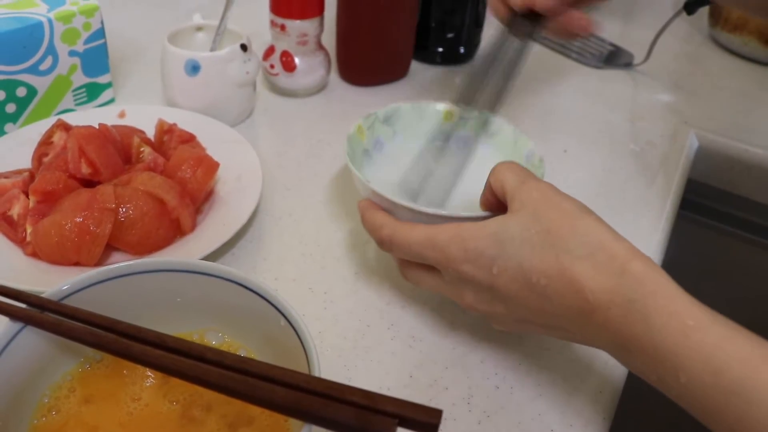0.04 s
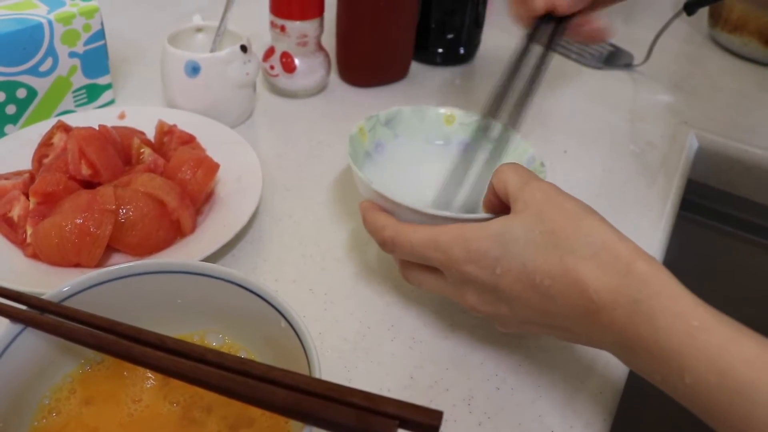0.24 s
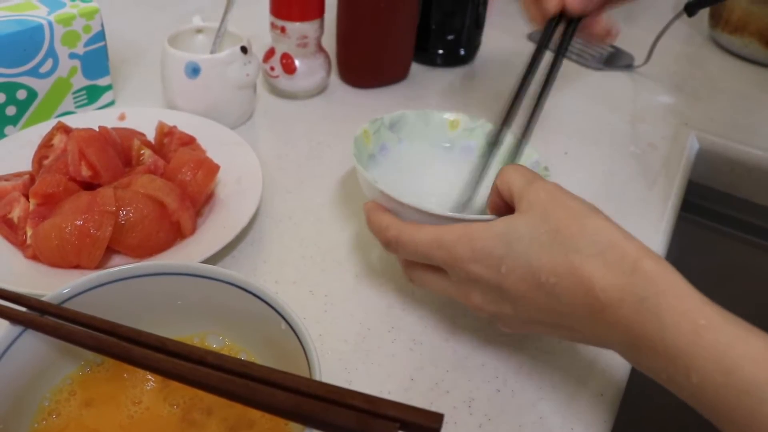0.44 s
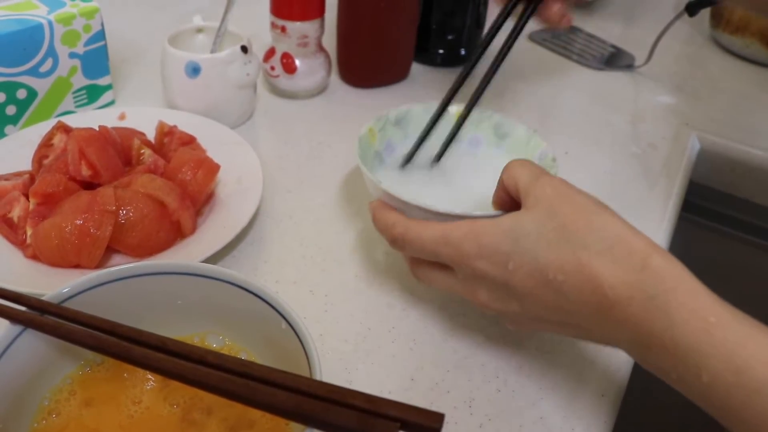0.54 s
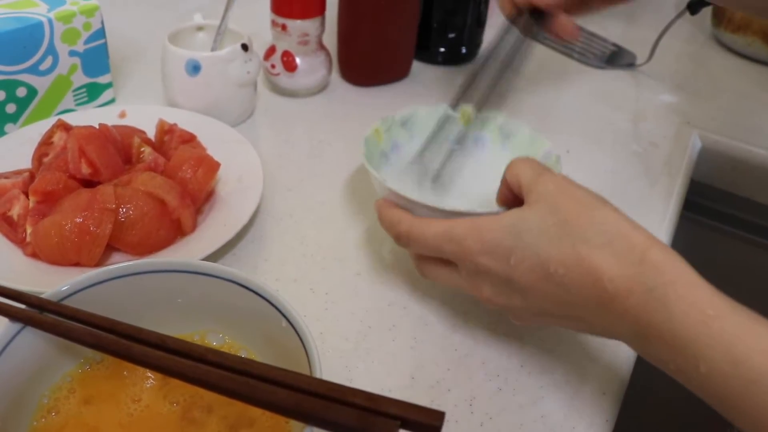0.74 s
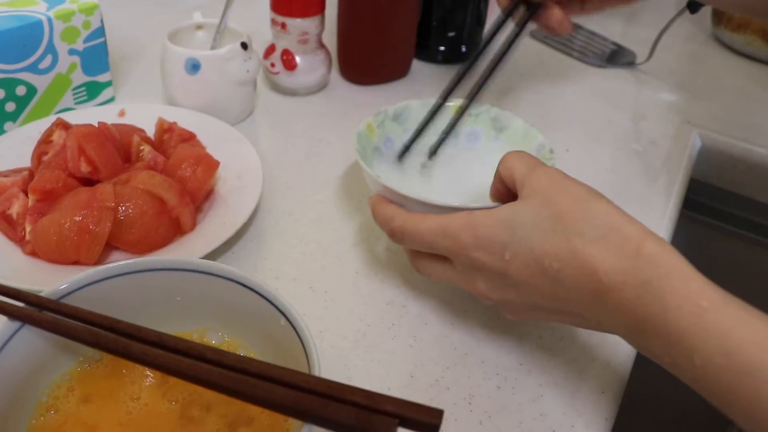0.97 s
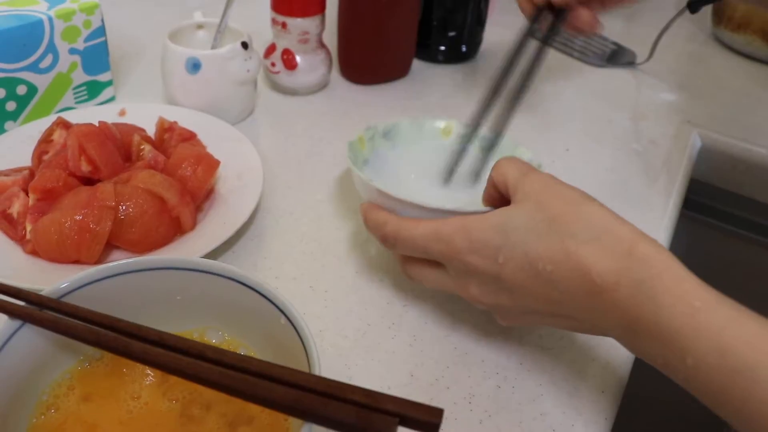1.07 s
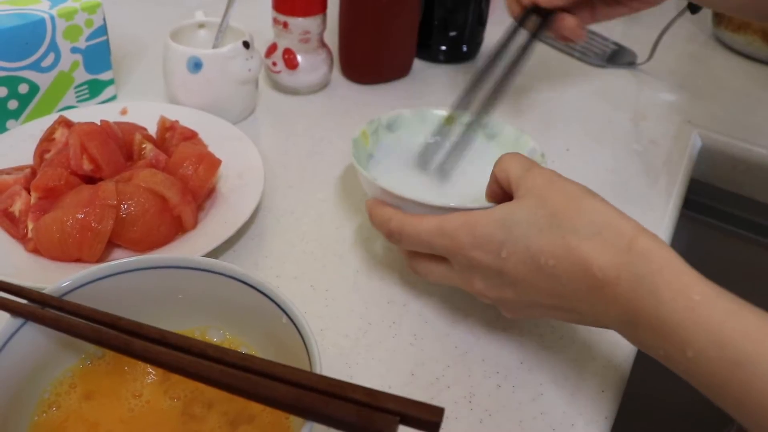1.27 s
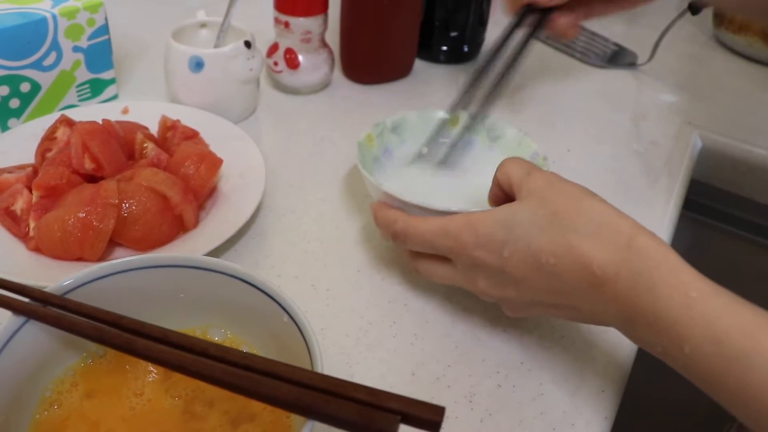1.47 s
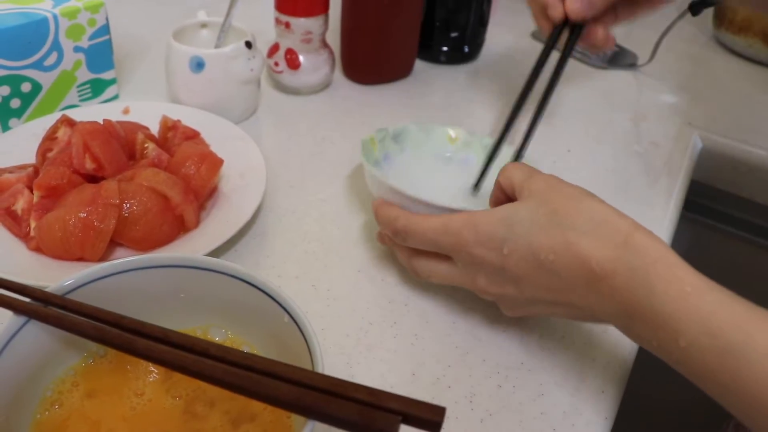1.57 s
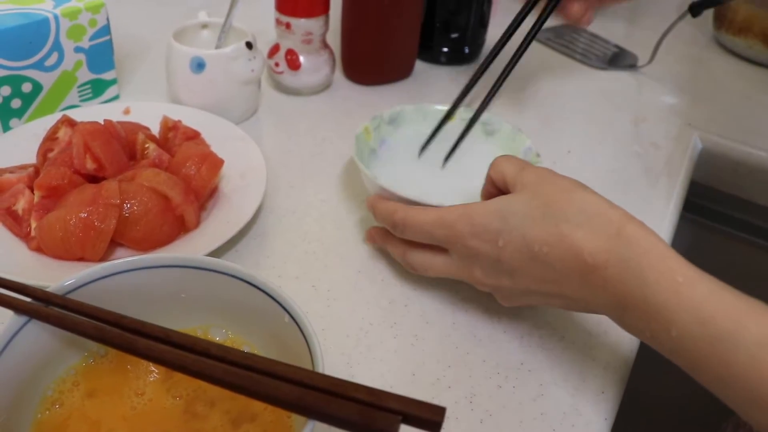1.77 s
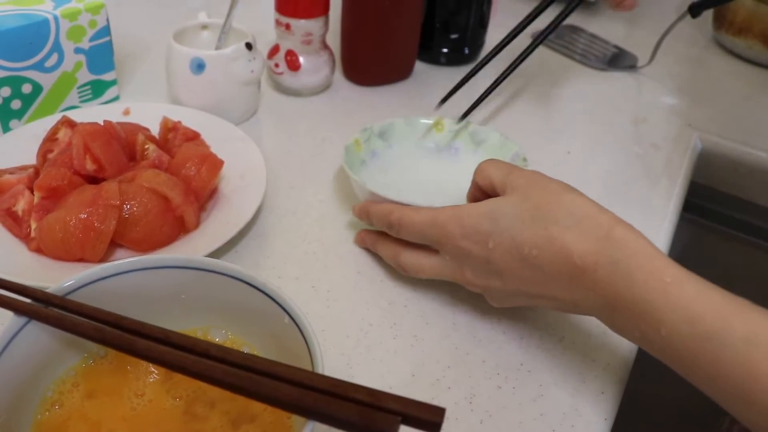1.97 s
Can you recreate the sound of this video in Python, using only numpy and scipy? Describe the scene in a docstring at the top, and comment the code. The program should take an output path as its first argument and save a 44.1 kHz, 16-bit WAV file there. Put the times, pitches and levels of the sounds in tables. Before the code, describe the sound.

Soft whisking of liquid with chopsticks, ending in a clink and a bowl set down hard.

```python
"""Whisking with chopsticks

Close to a hand-held ceramic bowl in a small ringing kitchen; stereo microphone, an appliance humming
behind. Chopsticks whisk a thin liquid: it sloshes, trapped bubbles ring, the tips scrape and tick on the
glaze. One chopstick clinks on the rim, then the bowl knocks on the counter, hard and then softly.
The microphone's limiter ducks after the hard knock."""
import sys
import numpy as np
from scipy import signal
from scipy.fft import rfft, irfft, next_fast_len
from scipy.io import wavfile
from scipy.ndimage import minimum_filter1d, map_coordinates

SR = 44100
rng = np.random.default_rng(int(sys.argv[2]) if len(sys.argv) > 2 else 0)


def materialize(psi):
    """Save the field psi as 16-bit PCM at rate SR to the path in sys.argv[1].

    A 1-D psi becomes a single channel; in a 2-D psi each row is a channel.
    """
    bounded = np.clip(np.atleast_2d(psi).T, -1, 1)
    quanta = np.round(bounded * 32767).astype(np.int16)
    wavfile.write(sys.argv[1], SR, quanta)


N = 88817

# room tone: f/Hz, level/dB
AIR_SPECTRUM = [(15, -30), (34, 0.5), (60, -12), (170, -1.5), (250, -10), (320, -5), (500, -12),
                (840, -16.5), (1940, -16.5), (3600, -24), (5000, -31.5), (6100, -24.5), (11300, -25.5),
                (16000, -35.5)]
# room tone across the microphone pair: f/Hz, left-right likeness
AIR_LIKENESS = [(40, 0.49), (150, 0.87), (400, 0.57), (1200, 0.1), (3000, 0.046)]
# decay of the kitchen: f/Hz, t60/s
ROOM_DECAY = [(150, 0.62), (500, 0.4), (3500, 0.35), (15000, 0.24)]
# colour of the kitchen's tail: f/Hz, level/dB
ROOM_SPECTRUM = [(60, -10), (140, 12), (270, 6), (420, 3), (650, 8), (1100, 3.5), (2000, 0), (3000, 3),
                 (6000, 0)]
# reflections across the microphone pair: f/Hz, left-right likeness
ROOM_LIKENESS = [(130, 1), (300, 0.9), (640, 0.7), (1400, 0.47), (3000, 0.023)]
# direct sound from the bowl in the hand: f/Hz, left minus right/dB
BOWL_BALANCE = [(800, 1.5), (2300, -10.5), (4400, 0), (8000, -11.5), (14000, -7.5)]
# direct sound from the counter: f/Hz, left minus right/dB
KNOCK_BALANCE = [(110, 5), (330, -4), (700, 3), (1300, 4.5), (2300, -6), (5000, 14)]
# the bowl's foot meeting the counter: t/s, gain/dB, treble corner/Hz
COUNTER_KNOCKS = [(1.6277, 2, 6000), (1.9944, -8, 1650)]
# bowl and counter ringing together: f/Hz, level/dB, t60/s
COUNTER_MODES = [(445, -7.5, 0.032), (560, -12, .022), (725, -21, 0.04), (885, -22, .03),
                 (1020, -11.5, 0.024), (1295, -21, 0.025), (1630, -6.5, 0.018), (2010, -17, 0.04),
                 (2335, -28, 0.04), (3030, -23, 0.03)]
# dense thud of the counter top: f/Hz, level/dB
THUD_SPECTRUM = [(80, -30), (250, -14), (500, 5), (1700, -1), (3200, -3), (4200, -11), (7000, -28),
                 (15000, -38)]
# ring of the rim: f/Hz, level/dB, t60/s
RIM_MODES = [(2009, -14, .12), (3145, -24, .08), (3755, -4, .02), (3826, -5, .02), (6033, -4, .034),
             (6250, 2, .016), (7095, -19, .05), (7639, -23, .09), (8500, -1, .014), (8600, -2, .02),
             (11400, -23, .12), (11525, -10, .026), (14980, -21, .03), (15450, -22, .04)]
# contact noise of chopstick on rim: f/Hz, level/dB
CRACK_SPECTRUM = [(500, -25), (2500, 2), (4800, -3), (8600, 0), (9800, -12), (12200, -7), (16000, -17)]
# tips touching the wall under the liquid: t/s, level/dB, band centre/Hz
TIP_TICKS = [(0.112, -41, 9100), (0.267, -50, 7000), (.307, -49, 10500), (.368, -44, 6040),
             (.464, -49, 2300), (0.675, -44.5, 5000), (.711, -50, 11300), (0.828, -49, 3300),
             (0.9406, -39, 8000), (1.023, -46, 6000), (1.271, -34.5, 2040), (1.367, -41, 7800),
             (1.448, -37, 8750), (1.483, -44, 7560), (1.532, -41, 7600), (1.532, -44, 2000),
             (1.623, -35, 2690), (1.801, -50, 6400)]
# single clear bubbles: t/s, starting f/Hz, level/dB, t60/s, rise/(octaves/s)
CLEAR_BUBBLES = [(.119, 2870, -48, 0.027, 12), (.209, 1645, -45, 0.046, 5), (0.227, 2200, -45.5, 0.044, 12),
                 (.268, 1740, -46, 0.034, 3.2), (.347, 2630, -49, 0.035, 25), (.575, 2070, -38, 0.037, 7.4),
                 (.706, 2780, -38.5, 0.027, 5.5), (.801, 1838, -43, 0.043, 19),
                 (.811, 1810, -35, 0.012, 5.5), (.827, 2925, -41.5, 0.041, 6.5),
                 (.932, 1890, -45, 0.055, 6.2), (1.015, 1480, -31.5, 0.029, 24.3),
                 (1.02, 1658, -34.5, 0.038, 2), (1.284, 1280, -36, 0.016, 6.2),
                 (1.346, 2325, -44.5, 0.061, 30), (1.448, 1414, -36, 0.072, 39),
                 (1.455, 2154, -34, 0.026, 53), (1.458, 2960, -24, 0.021, 11)]
# sloshing liquid: f/Hz, level/dB
SLOSH_SPECTRUM = [(400, -34), (1100, -16), (1800, 3.5), (2400, 0), (3100, 5), (4000, -22), (7000, -14.5)]
# tips scraping the glaze: f/Hz, level/dB
SCRAPE_SPECTRUM = [(1500, -33), (3000, -6), (4500, 1), (6200, 1.5), (6900, -2.5), (7550, 5), (8300, -3),
                   (10000, 2), (11400, 6), (12600, -2), (16000, -15.5)]
# strokes through the liquid: middle t/s, half length/s, slosh level/dB, scrape level/dB
WHISK_STROKES = [(0.032, 0.024, -56.5, -55), (0.137, 0.023, -60.5, -64), (0.217, 0.016, -58, -59),
                 (0.362, 0.027, -64, -59), (0.454, 0.034, -59.5, -61.5), (0.575, 0.019, -56, -54.5),
                 (0.66, 0.025, -58.5, -59), (0.711, 0.029, -57, -57.5), (0.801, 0.02, -56, -60),
                 (0.926, 0.021, -52.5, -53), (1.017, 0.015, -53.5, -54), (1.13, 0.027, -65.5, -73),
                 (1.187, 0.017, -58.5, -56), (1.281, 0.024, -55, -68), (1.384, 0.02, -53.5, -57),
                 (1.482, 0.01, -50.5, -58), (1.561, 0.017, -53.5, -78)]

SIDES = np.array([[.5], [-.5]])  # left and right each take half of a difference


def amp(db):
    return 10 ** (np.asarray(db) / 20)


def unit_rms(x):
    return x / np.sqrt(np.mean(x ** 2) + 1e-20)


def along(points, hz):
    """A curve through (f/Hz, value) points, read on a log axis."""
    freqs, values = np.transpose(points)
    return np.interp(np.log(hz + 1), np.log(freqs + 1), values)


def since(s):
    """Seconds since s, zero before it."""
    return np.maximum(np.arange(N) / SR - s, 0)


def fade(s, t60):
    """A sudden start at s and an exponential decay."""
    t = since(s)
    return (t > 0) * amp(-60 * t / t60)


def ring(s, modes):
    """Damped sines (f/Hz, level/dB, t60/s) of a body struck at s."""
    t = since(s)
    return sum(amp(db) * fade(s, t60) * np.sin(2 * np.pi * hz * t) for hz, db, t60 in modes)


def wobble(rate):
    """A smooth random curve, rate knots a second."""
    return map_coordinates(rng.standard_normal(N), [np.arange(N) * rate / SR])


def filtered(x, response):
    """x through a complex frequency response."""
    size = next_fast_len(N + SR // 2)
    return irfft(rfft(x, size) * response(np.fft.rfftfreq(size, 1 / SR)), size)[..., :N]


def low_cut(hz, corner_hz):
    """Second-order high-pass: small bodies radiate little bass."""
    s = 1j * hz / corner_hz
    return s * s / (1 + np.sqrt(2) * s + s * s)


def high_cut(hz, corner_hz):
    """Response of a soft contact: a gentle tilt, then a steep fall above the corner."""
    s = 1j * hz / corner_hz
    return 1 / ((1 + 2 * s) * (1 + s + s * s))


def noise(spectrum):
    """Coloured noise of rms 1."""
    return unit_rms(filtered(rng.standard_normal(N), lambda hz: amp(along(spectrum, hz))))


def diffuse(pair, likeness):
    """Two unrelated sounds blended into left and right of a given likeness."""
    angle = lambda hz: np.arccos(np.clip(along(likeness, hz), -1, 1)) / 2
    mid, side = filtered(pair, lambda hz: np.array([np.cos(angle(hz)), np.sin(angle(hz))]))
    return np.array([mid + side, mid - side])


def room_tone(level_db=-56.5):
    """The kitchen's air, all around the microphone."""
    pair = np.array([noise(AIR_SPECTRUM), noise(AIR_SPECTRUM)])
    return amp(level_db) * unit_rms(diffuse(pair, AIR_LIKENESS))


def appliance_hum(hz=182.5, rms_db=-58.7, waver_db=.8):
    """An appliance's faint, slightly unsteady tone, centred in the background."""
    level = amp(rms_db + waver_db * wobble(rate=5))
    return np.sqrt(2) * level * np.sin(2 * np.pi * hz * since(0))


def early_echoes(first_s, last_s=0.01, level_db=-7.5, count=8):
    """Weak copies off counter, dishes and wall, different on each side of the microphone."""
    echoes = np.zeros((2, N))
    for side in echoes:
        delays = first_s + (last_s - first_s) * rng.random(count) ** 2
        side[(delays * SR).astype(int)] = rng.choice([-1, 1], count) / np.sqrt(count)
    return amp(level_db) * echoes


def in_kitchen(x, balance, tail_db=-12.5, first_echo_s=.0018, build_s=0.000896, left_lag_s=.000045):
    """At the microphone: the direct sound, on the right first, then early echoes and the room's tail."""
    hz, t, bands = signal.stft(rng.standard_normal((2, N)), SR, nperseg=256)
    decay = amp(-60 * t / along(ROOM_DECAY, hz)[:, None])
    tail = signal.istft(bands * decay, SR, nperseg=256)[1][:, :N]
    tail *= 1 - np.exp(-since(first_echo_s) / build_s)
    tail = filtered(tail / np.linalg.norm(tail[0]), lambda hz: amp(tail_db + along(ROOM_SPECTRUM, hz)))
    room = diffuse(tail + early_echoes(first_echo_s), ROOM_LIKENESS)
    reflected = signal.fftconvolve(x[None], room, axes=1)[:, :N]
    lag = lambda hz: np.exp(-2j * np.pi * hz * SIDES * left_lag_s)
    direct = filtered(x, lambda hz: amp(SIDES * along(balance, hz)) * lag(hz))
    return direct + reflected


def counter_knock(s, gain_db, corner_hz, push_s=.0001):
    """The bowl lands: a short push, modes of bowl and counter, a dense thud; softer contact is duller."""
    t = since(s)
    widths = t / push_s - 3  # time from the middle of the push, in pulse widths
    push = -amp(7.5) * widths * np.exp(-widths ** 2 / 2) * (t > 0)
    thud = amp(-11.5) * fade(s, t60=0.028) * noise(THUD_SPECTRUM)
    knock = push + ring(s, COUNTER_MODES) + thud
    return amp(gain_db) * filtered(knock, lambda hz: low_cut(hz, corner_hz=290) * high_cut(hz, corner_hz))


def rim_clink(s=1.5769, attack_s=0.00016):
    """A chopstick strikes the rim with a crack; the hand keeps the ring short."""
    rim = amp(-19) * ring(s, RIM_MODES)
    crack = amp(-29) * fade(s, t60=0.028) * noise(CRACK_SPECTRUM)
    contact = 1 - np.exp(-since(s) / attack_s)
    return filtered(contact * (rim + crack), lambda hz: low_cut(hz, corner_hz=1400))


def tip_ticks(attack_s=0.00034, width_octaves=0.73):
    """Light touches of the tips on the bowl's wall, cushioned by the liquid."""
    ticks = np.zeros(N)
    for s, db, centre_hz in TIP_TICKS:
        band = lambda hz: 1 / (1 + (2 * np.log2((hz + 1) / centre_hz) / width_octaves) ** 2)
        envelope = fade(s, t60=0.013) * (1 - np.exp(-since(s) / attack_s))
        ticks += amp(db) * envelope * unit_rms(filtered(rng.standard_normal(N), band))
    return ticks


def bubble(t, hz, t60, rise, attack_s=0.0017):
    """Trapped air rings briefly, rising in pitch as it surfaces."""
    phase = 2 * np.pi * np.cumsum(hz * 2 ** (rise * np.minimum(t, t60))) / SR
    return amp(-60 * t / t60) * (1 - np.exp(-t / attack_s)) * np.sin(phase)


def bubbles(fizz_hz=2464, spread_octaves=0.349, t60_cycles=29, rise_octaves_per_s=19):
    """A few clear bubbles, and a fizz of nine faint ones scattered around every stroke."""
    fizz = []
    for s, half_s, slosh_db, _ in WHISK_STROKES:
        for when, pitch, size in rng.standard_normal((9, 3)):
            start_s = abs(s + 0.81 * half_s * when)
            hz = fizz_hz * 2 ** (spread_octaves * pitch)
            db = slosh_db - 1.5 + 2.8 * size
            fizz.append((start_s, hz, db, t60_cycles / hz, rise_octaves_per_s))
    sound, t = np.zeros(N + SR), np.arange(SR // 10) / SR
    for s, hz, db, t60, rise in list(CLEAR_BUBBLES) + fizz:
        sound[round(s * SR):][:len(t)] += amp(db) * bubble(t, hz, t60, rise)
    return sound[:N]


def glaze_catches(per_s=200, spread_db=5, longest_t60=.035):
    """The tips catch and slip on the glaze; every catch rings the bowl's high modes."""
    slips = (rng.random(N) < per_s / SR) * amp(spread_db * rng.standard_normal(N))
    evened_modes = [(hz, db / 3, min(t60, longest_t60)) for hz, db, t60 in RIM_MODES]
    ringing = signal.fftconvolve(slips, ring(0, evened_modes))[:N]
    return unit_rms(filtered(ringing, lambda hz: low_cut(hz, corner_hz=7000)))


def whisking(drag_db=-69.5, drag_end_s=1.8, drag_fade_s=.05, grit_db=3.5, catch_db=-5.5):
    """Each stroke swells and fades over the tips' steady drag: a grainy slosh and a scrape on glaze."""
    t, slosh_level = since(0), np.zeros(N)
    scrape_level = amp(drag_db) * np.clip((drag_end_s - t) / drag_fade_s, 0, 1)
    for s, half_s, slosh_db, scrape_db in WHISK_STROKES:
        swell = 1 / np.cosh(1.49 * (t - s) / half_s)
        slosh_level += amp(slosh_db) * swell
        scrape_level = np.hypot(scrape_level, amp(scrape_db) * swell)
    grit = unit_rms(amp(grit_db * wobble(rate=430)))
    swish = slosh_level * noise(SLOSH_SPECTRUM) + scrape_level * noise(SCRAPE_SPECTRUM)
    return grit * swish + amp(catch_db) * scrape_level * glaze_catches()


def scene():
    """The kitchen from the microphone's place, with the held bowl a little to the right."""
    stirring = in_kitchen(whisking() + bubbles() + tip_ticks(), BOWL_BALANCE)
    knocks = sum(in_kitchen(counter_knock(*row), KNOCK_BALANCE) for row in COUNTER_KNOCKS)
    clink = in_kitchen(rim_clink(), BOWL_BALANCE) * amp(-3 * SIDES)  # 3 dB further right
    return room_tone() + appliance_hum() + knocks + clink + stirring


def record(dry):
    """The microphone's limiter ducks, holds and recovers; peaks clip, and the top treble is cut."""
    threshold_db, attack_s, hold_s, recover_db_per_s = -1, 0.00033, 0.049, 105
    ceiling, top_hz = .62, 16000
    peak_db = 20 * np.log10(np.abs(dry).max(axis=0) + 1e-9)
    over_db = np.maximum(peak_db - threshold_db, 0)
    half_hold = int(hold_s * SR / 2)
    held_db = -minimum_filter1d(-over_db, 2 * half_hold + 1, origin=half_hold, mode="constant")
    recovery_db = recover_db_per_s * since(0)
    duck_db = np.maximum.accumulate(held_db + recovery_db) - recovery_db
    pole = np.exp(-1 / (attack_s * SR))  # the attack lets the first peak slip through
    ducked = dry * amp(-signal.lfilter([1 - pole], [1, -pole], duck_db))
    clipped = np.clip(ducked, -ceiling, ceiling)
    return filtered(clipped, lambda hz: 1 / (1 + (hz / top_hz) ** 200))


dry = scene()
out = record(dry)
materialize(out)
```